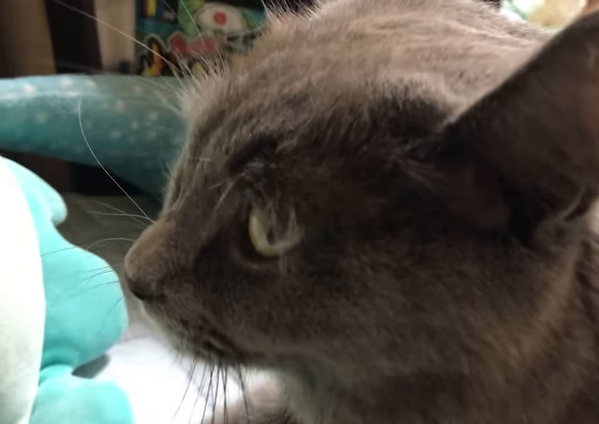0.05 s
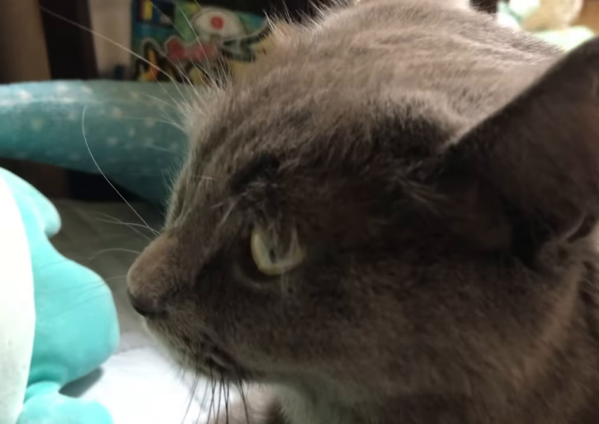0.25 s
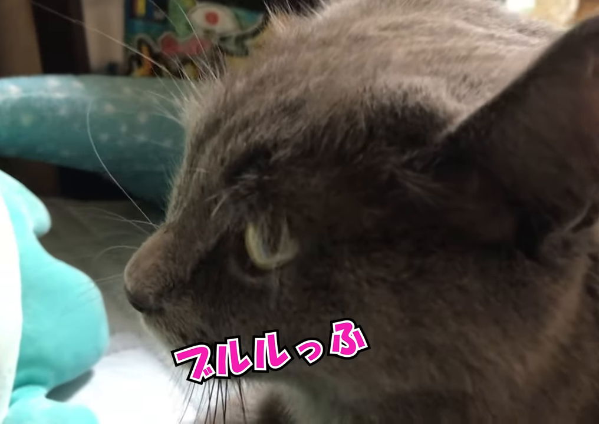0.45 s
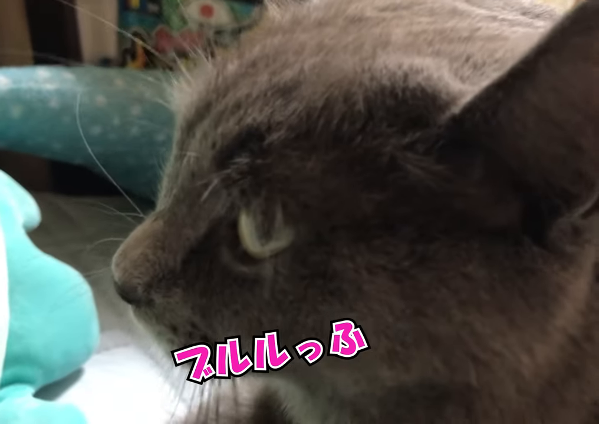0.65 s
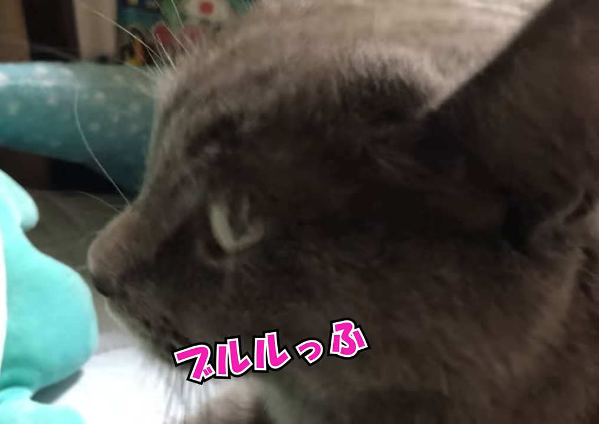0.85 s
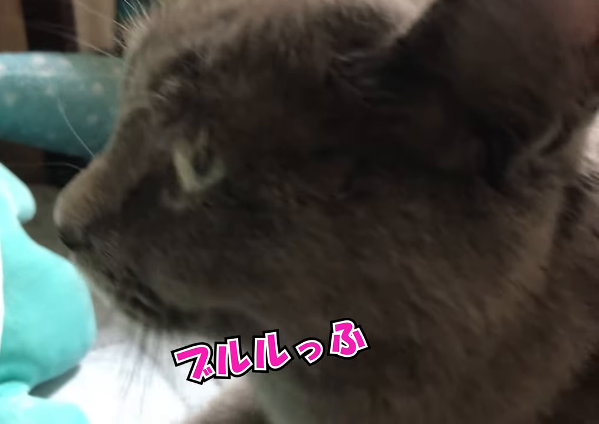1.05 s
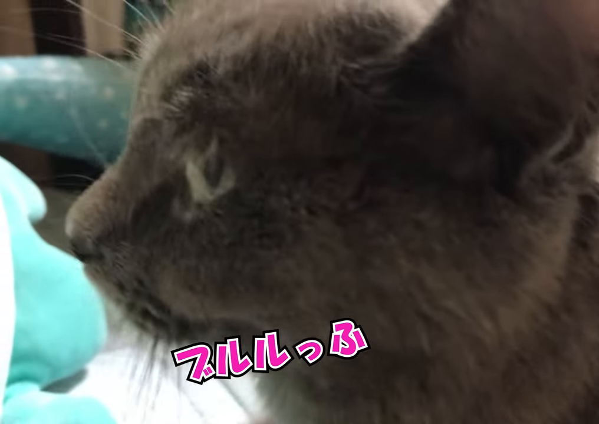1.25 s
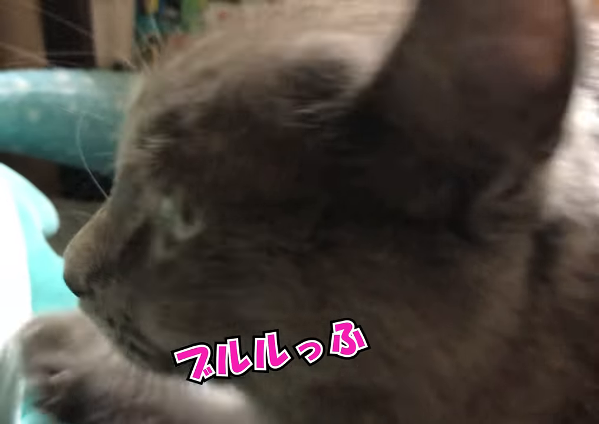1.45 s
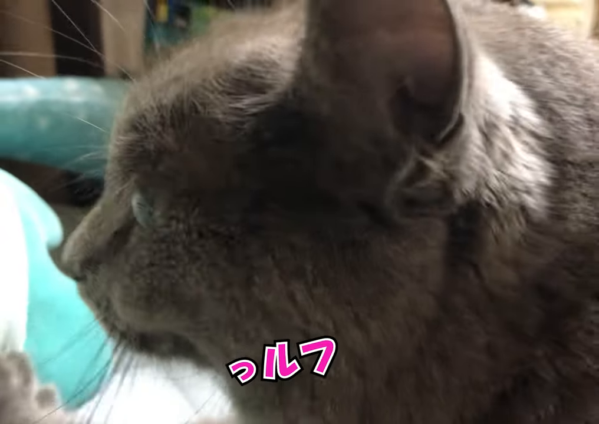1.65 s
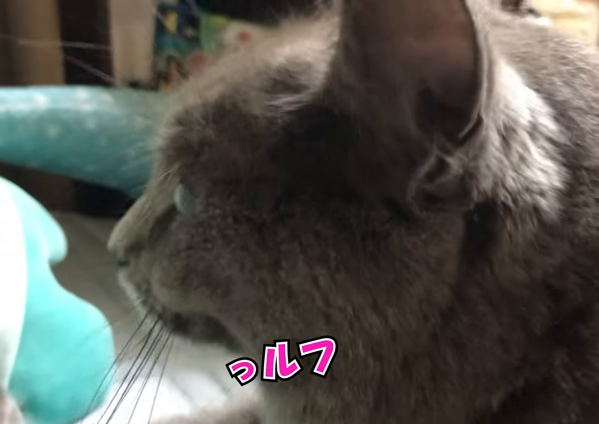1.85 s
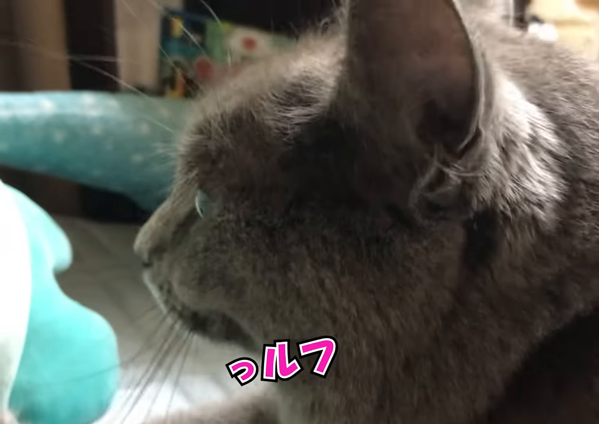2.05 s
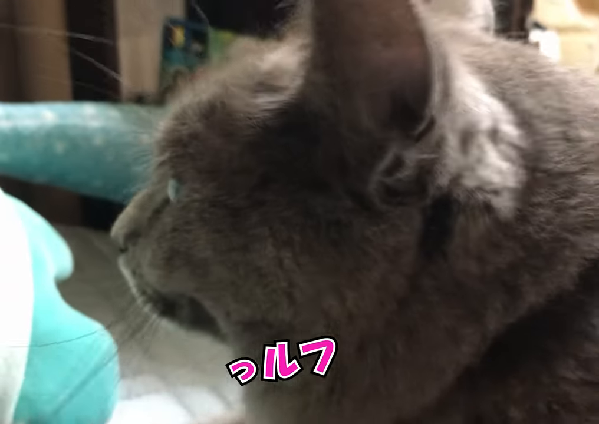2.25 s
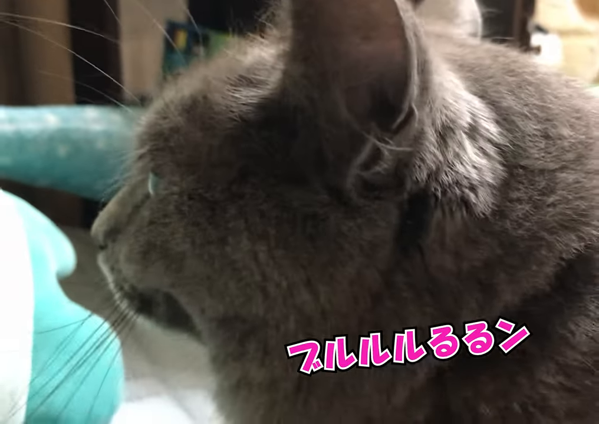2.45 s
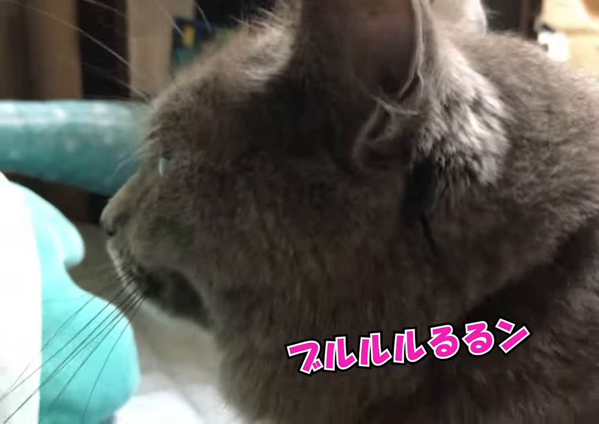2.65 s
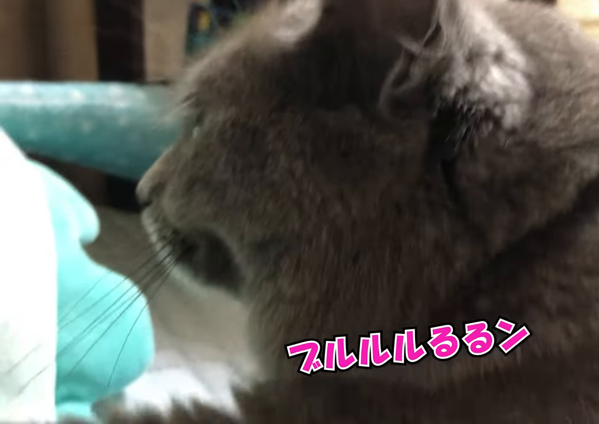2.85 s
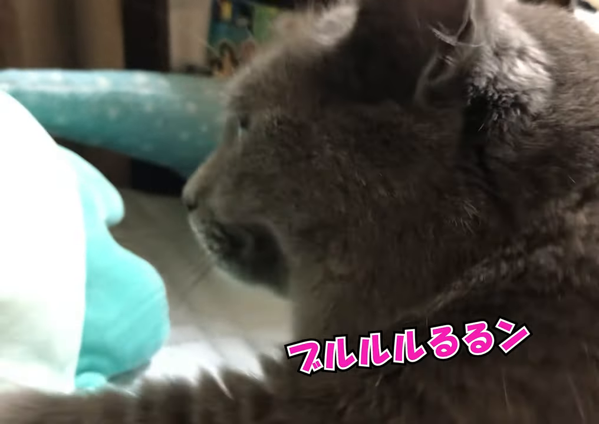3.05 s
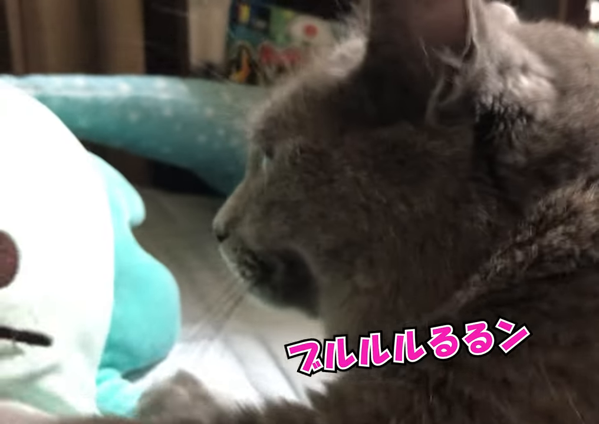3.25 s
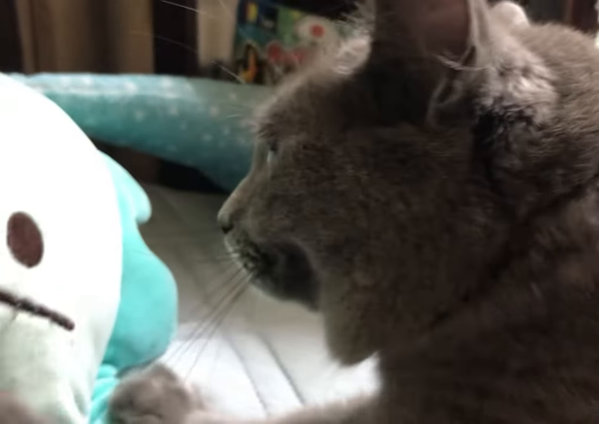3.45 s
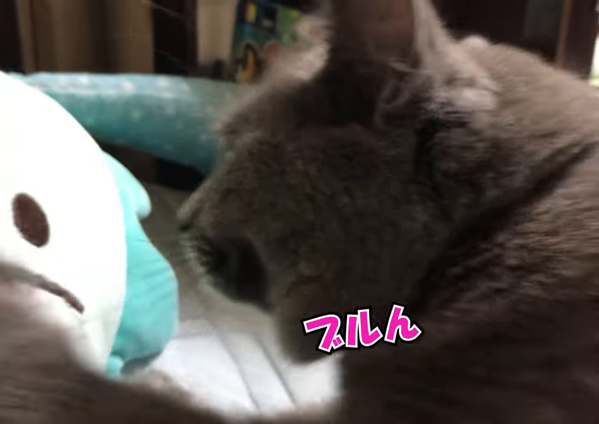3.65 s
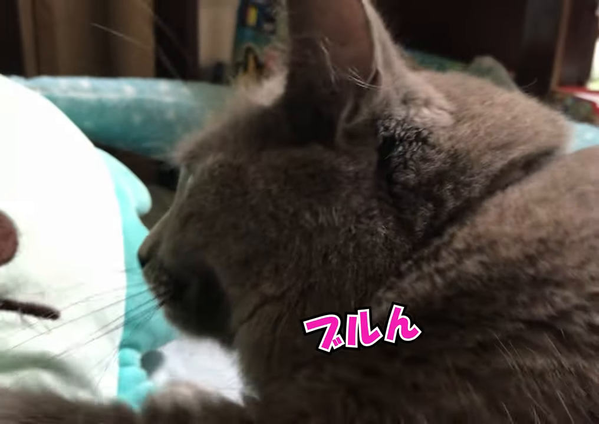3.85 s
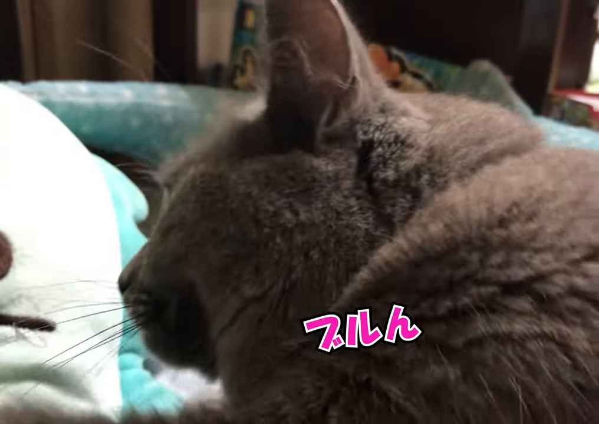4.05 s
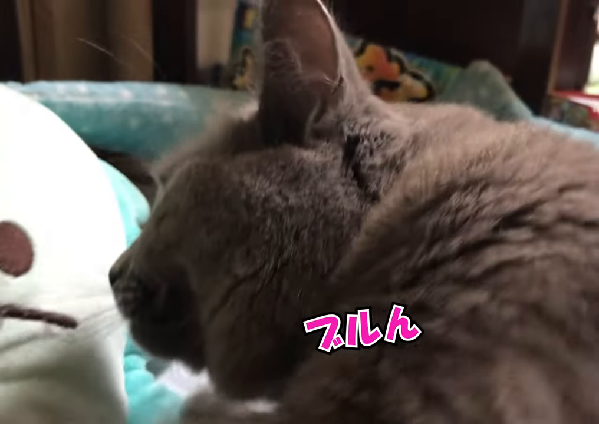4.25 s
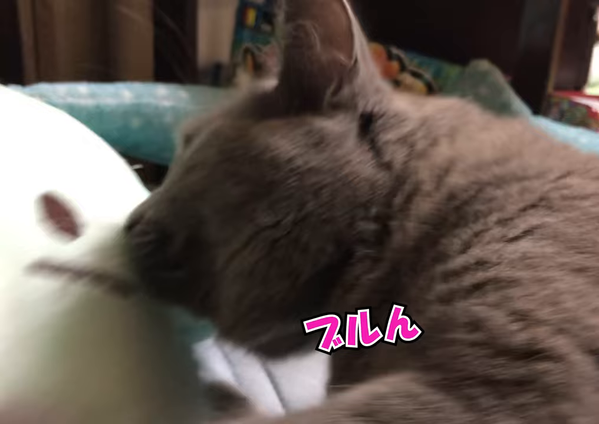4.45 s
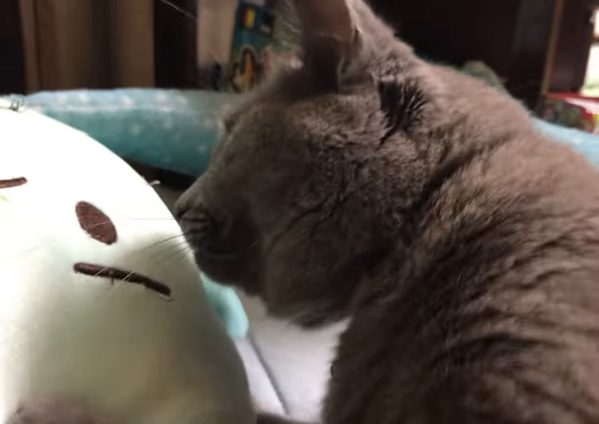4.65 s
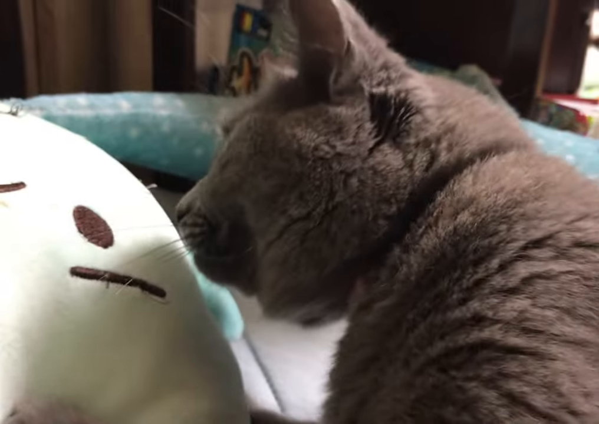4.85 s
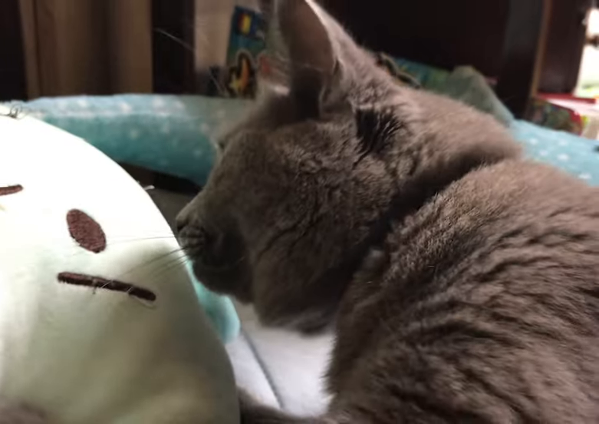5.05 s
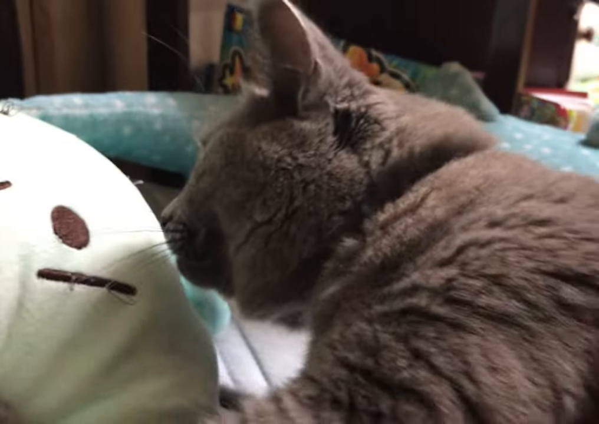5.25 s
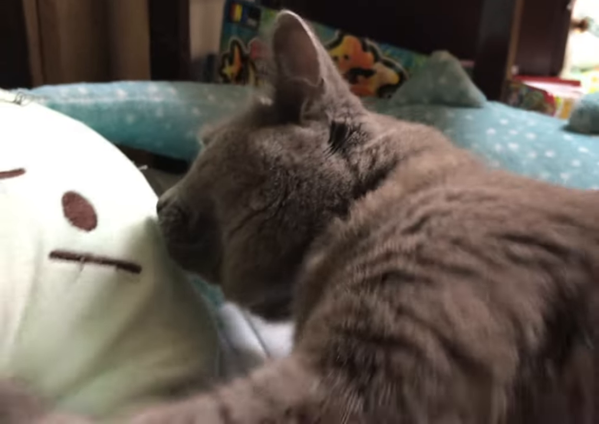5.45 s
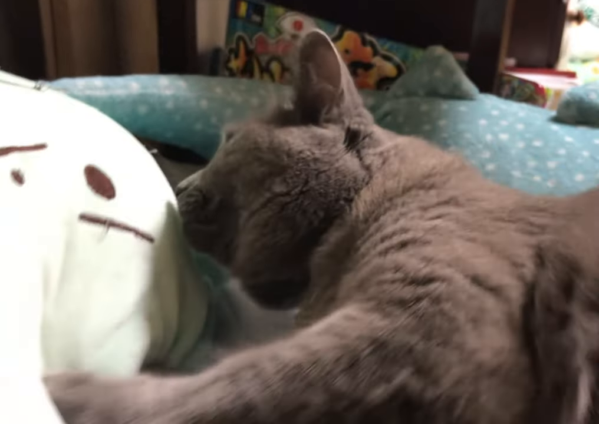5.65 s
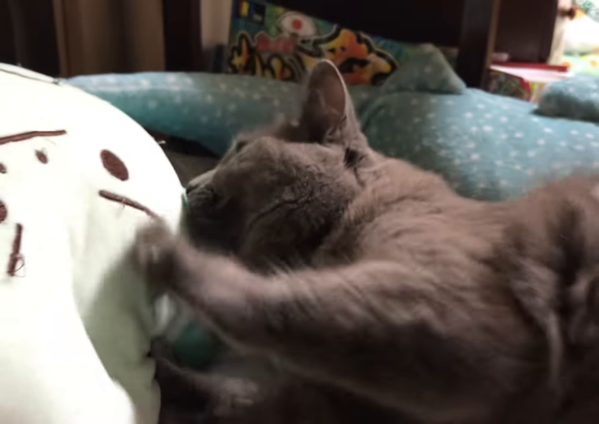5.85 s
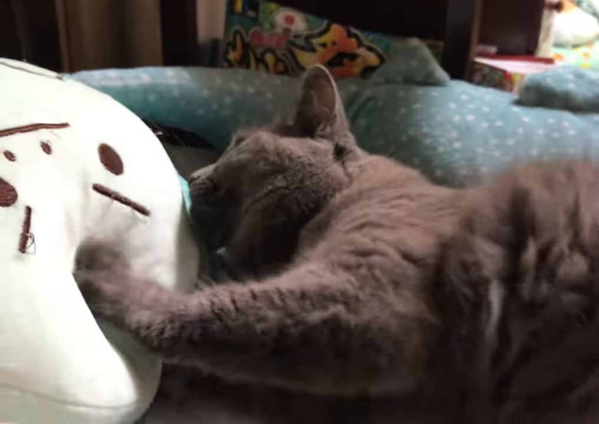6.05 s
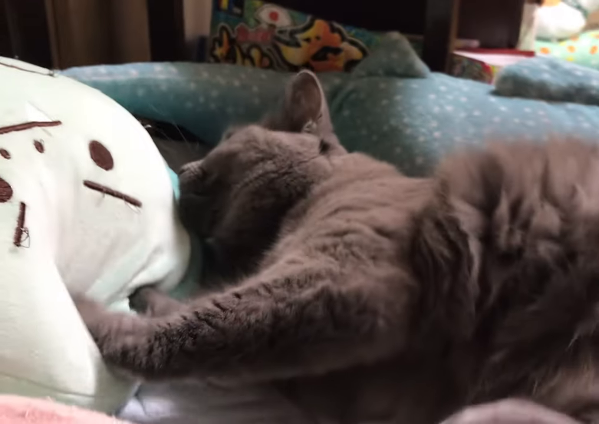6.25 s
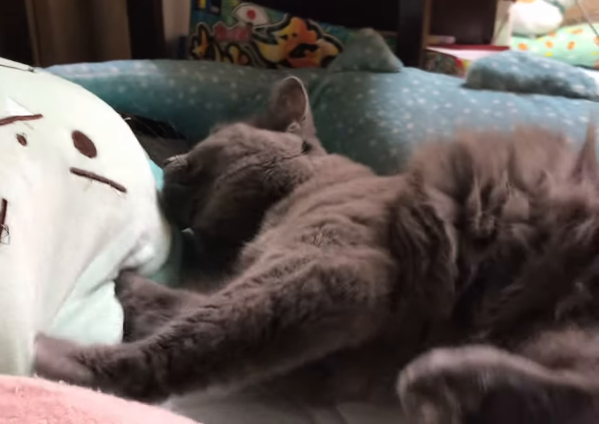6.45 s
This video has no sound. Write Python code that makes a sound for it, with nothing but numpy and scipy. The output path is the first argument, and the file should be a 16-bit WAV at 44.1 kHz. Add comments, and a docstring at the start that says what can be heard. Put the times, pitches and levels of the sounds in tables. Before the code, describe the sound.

Very close to the microphone in a quiet room, a cat purrs in five short bouts. A dull paw push and cloth slap come first, then a loud, rattling purr with hard knocks, a wet smack and tiny squeaks. Two more strong purrs follow with soft grunts, then two weaker, breathier ones. Small clicks, puffs and a hollow cluck fill the gaps before it fades to near silence.

```python
"""Cat purring and kneading

A cat purrs in five short bouts, its head close to the microphone, while kneading a cushion in a quiet room.
The larynx snaps shut about 29 times a second and rings throat, mouth and nose; air rushes between the snaps.
Effort, mouth opening and the nasal ring steer each bout; a faint rasp follows, and a few closures knock hard.
Within and between the bouts come soft grunts, a cluck, lip smacks, tongue ticks, tiny wet squeaks,
soft narrow bands of noise and dull pushes of the paws."""
import sys
import numpy as np
from scipy import signal
from scipy.fft import rfft, irfft, next_fast_len
from scipy.io import wavfile
from scipy.ndimage import map_coordinates

SR = 44100
rng = np.random.default_rng(int(sys.argv[2]) if len(sys.argv) > 2 else 0)


def store_pcm(level_fs):
    """Save levels as 16-bit WAV."""
    pcm = np.round(np.clip(level_fs, -1, 1) * 32767).astype(np.int16)
    wavfile.write(sys.argv[1], SR, np.atleast_2d(pcm).T)


N = 287223
T = np.arange(N) / SR

# mouth colour before tilt and drift: (frequency [Hz], relative level [dB])
MOUTH = [(620, -23), (860, -17.5), (960, 9), (1120, 8), (1490, 4), (1590, -24.5), (2500, -61)]
# nasal ring colour: (frequency [Hz], relative level [dB])
NASAL = [(1800, -49), (2300, -28.5), (2450, -1), (2900, -2.5), (3120, -28), (4200, -50)]
# low pop of throat and mouth: (frequency [Hz], relative level [dB])
POP = [(95, -52), (205, 5.5), (420, -1), (570, -2.5), (720, -55.5)]
# bright click of lips and tongue, before any tilt: (frequency [Hz], relative level [dB])
CLICK = [(650, -84.5), (960, 12.5), (1750, 4.5), (2000, -12.5), (2800, -21.5), (3300, -41), (16000, -61)]


def amp(db):
    """Amplitude of a level in dB."""
    return 10 ** (np.asarray(db) / 20)


def evened(x):
    """Scales to an RMS of 1."""
    return x / np.sqrt(np.mean(x ** 2) + 1e-20)


def add(mix, s, sound):
    """Lays a sound into the mix at time s."""
    part = mix[round(s * SR):][:len(sound)]
    part += sound[:len(part)]


def follow(rows, t):
    """The columns of a curve at the times t, joined by straight lines."""
    s, *columns = np.transpose(rows)
    return [np.interp(t, s, c) for c in columns]


def colour(x, points):
    """Filters by a spectrum of (Hz, dB) points, cut to -120 dB outside them."""
    size = next_fast_len(len(x))
    hz = np.fft.rfftfreq(size, 1 / SR)
    point_hz, point_db = np.transpose(points)
    gain_db = np.interp(np.log(hz + 1), np.log(point_hz), point_db, left=-120, right=-120)
    return irfft(rfft(x, size) * amp(gain_db), size)[:len(x)]


def tilted(points, db_per_octave):
    """A spectrum made brighter or duller, pivoting on its first point."""
    return [(hz, db + db_per_octave * np.log2(hz / points[0][0])) for hz, db in points]


def analysed(x, size):
    """Short-time spectrum: frequencies [Hz], frame times [s], complex bins."""
    return signal.stft(x, SR, nperseg=size, noverlap=size - size // 4)


def resynthesised(z, size, length):
    """Sound of a short-time spectrum."""
    return signal.istft(z, SR, nperseg=size, noverlap=size - size // 4)[1][:length]


def steadied(x, rate_hz):
    """Holds the power over three purr cycles at 1 and softens both ends."""
    window = np.hanning(int(3 * SR / rate_hz))
    power = abs(signal.fftconvolve(x ** 2, window / window.sum(), "same"))
    return x / np.sqrt(power + 1e-14) * signal.windows.tukey(len(x), .04)


def wavering(x, depth_db=4.5, breadth_hz=212.4, duration_s=0.03954):
    """Drifting patches of random gain, so that the colour shifts from moment to moment."""
    size = 512
    z = analysed(x, size)[2]
    rows, columns = np.indices(z.shape)
    patches = rng.standard_normal((256, 256))
    place = [rows * SR / size / breadth_hz, columns * (size // 4) / SR / duration_s]
    gain_db = depth_db * map_coordinates(patches, place, order=1, mode="mirror")
    return resynthesised(z * amp(gain_db), size, len(x))


def resonant(x, t, curve, peak_db, width_hz):
    """Lifts a resonance that follows a curve of (s, Hz) points."""
    size = 1024
    hz, when, z = analysed(x, size)
    off_hz = hz[:, None] - follow(curve, t[0] + when)[0]
    return resynthesised(z * amp(peak_db * np.exp(-(off_hz / width_hz) ** 2)), size, len(x))


def snap(points):
    """One sharp impulse of a given colour, scaled by its highest crest, a sixteenth of a second in."""
    sound = colour(1. * (np.arange(SR // 8) == SR // 16), points)
    return sound / sound.max()


def burst(points, db, tail_db, tail_t60, rise_t60, bend=1.43):
    """A sharp snap a sixteenth of a second in, wrapped in a short fizz of its colour that dies ever faster."""
    t = np.arange(-SR // 16, SR // 4) / SR
    crack = colour(1. * (t == 0), points)
    fall = (np.maximum(t, 0) / tail_t60) ** bend
    envelope = amp(-60 * np.maximum(fall, -t / rise_t60))
    fizz = evened(colour(rng.standard_normal(len(t)), points)) * envelope
    return t[0], amp(db) * (crack / crack.max() + amp(tail_db) * fizz)


def larynx(t, first, rate_hz, air_db, leak, lead, spread, uneven_db=2, jitter_s=.0006):
    """A snap at each closure, and turbulence that swells just before it; lead and spread in cycles."""
    count = int((t[-1] - first) * rate_hz) + 1
    slip, size = rng.standard_normal((count, 2)).T
    at = np.round((first + np.arange(count) / rate_hz + jitter_s * slip - t[0]) * SR).astype(int)
    snaps = np.zeros(len(t))
    snaps[np.clip(at, 0, len(t) - 1)] = amp(uneven_db * size) * (at > 0)
    phase = ((t - first) * rate_hz + lead + .5) % 1 - .5
    gate = leak + np.exp(-(phase / spread) ** 2)
    air = evened(gate * rng.standard_normal(len(t)))
    return evened(snaps) + amp(air_db) * air


def throat(x, t, centre_hz, level_db, width_hz, upper_db):
    """A moving resonance with a sharp core and a fixed one above; both dull as effort and resonance sink."""
    upper_hz, upper_width_hz, chest_hz = 510, 80, 198
    core_db, core_width_hz = -9, 38
    broaden, brighten, rise_db_per_octave = 0.099, 0.45, 36  # first two in dB per dB of openness
    size = 2048
    hz, when, z = analysed(x, size)
    hz = hz[:, None]
    octaves = np.log2(centre_hz / np.median(centre_hz))
    openness_db = level_db - np.median(level_db) + rise_db_per_octave * octaves
    open_db = np.interp(t[0] + when, t, openness_db)
    off_hz = hz - np.interp(t[0] + when, t, centre_hz)
    main = np.exp(-(off_hz / (width_hz * amp(broaden * open_db))) ** 2)
    core = amp(core_db) * np.exp(-(off_hz / core_width_hz) ** 2)
    upper = amp(upper_db + brighten * open_db) * np.exp(-((hz - upper_hz) / upper_width_hz) ** 2)
    low_cut = 1 / np.sqrt(1 + (chest_hz / (hz + 1)) ** 20)
    return resynthesised(z * (main + core + upper) * low_cut, size, len(x))


def purr():
    """Each bout's snaps and rushing air drive throat, mouth, lips and nose; a faint rasp rides on top."""
    # one row a bout: (first snap [s], snap rate [Hz])
    beats = [(.4435, 28.9), (1.519, 28.6), (2.504, 29.04), (3.721, 28.2), (5.293, 28.5)]
    # airway, one row a bout: (throat width at median openness [Hz], upper throat mode there [dB],
    # throat air re snaps [dB], mouth air re snaps [dB], mouth tilt [dB/octave],
    # rasp resonance [Hz], rasp offset before effort and mouth terms [dB])
    bouts = [(127.3, -21.5, -2, -0.5, 0, 6400, -59.5), (108.2, -11.5, -2.5, -0.5, -19.5, 4500, -59),
             (105, -14, -1, 4, 0, 5600, -61.5), (77.4, -32.5, 8.5, 4, -13, 5000, -59.5),
             (60, -31.5, 7, 1.5, -2.5, 4640, -59)]
    # effort, one curve a bout: (time [s], throat level [dB], throat resonance [Hz])
    efforts = [
        [(0.425, -59.5, 323), (0.51, -31.5, 270), (0.679, -29, 313), (0.867, -31.5, 241), (0.899, -39, 235.5),
         (1.005, -27.5, 325.5), (1.15, -75.5, 251)],
        [(1.51, -49, 220), (1.575, -64, 430), (1.618, -30.5, 440), (1.692, -28, 367), (1.73, -41.5, 312),
         (1.765, -32.5, 379), (1.831, -38, 440.4), (1.92, -41.5, 396.3), (2.06, -66, 350)],
        [(2.485, -52.5, 370), (2.533, -20, 312.6), (2.617, -37, 323), (2.701, -31, 301), (3.031, -34, 300),
         (3.075, -51.5, 270), (3.089, -40, 270.6), (3.17, -60, 245)],
        [(3.7, -71.5, 378), (3.752, -39, 386), (3.834, -53.5, 354.4), (3.892, -36, 343), (3.975, -48, 347),
         (4.035, -36.5, 387), (4.115, -48.5, 321), (4.18, -35.5, 375), (4.294, -46, 373), (4.38, -84, 323)],
        [(5.28, -68, 389), (5.334, -41, 347), (5.406, -40, 374), (5.45, -58, 397), (5.57, -74, 327),
         (5.616, -41, 403), (5.67, -51.5, 387), (5.874, -52, 420), (6.09, -74.5, 379)],
    ]
    # mouth opening, one curve a bout: (time [s], mouth level [dB])
    openings = [
        [(0.47, -88), (0.505, -46), (0.56, -34), (0.862, -44), (0.95, -63.5), (0.992, -40), (1.14, -76.5)],
        [(1.505, -65), (1.604, -52.5), (1.622, -40), (1.648, -36), (1.758, -63), (2.06, -77)],
        [(2.49, -91.5), (2.536, -37.5), (2.608, -52), (2.702, -43), (2.852, -63.5), (2.885, -45), (2.992, -42),
         (3.1, -85)],
        [(3.82, -77.5), (3.96, -61.5), (4.006, -41), (4.094, -50), (4.174, -43.5), (4.224, -59.5), (4.324, -60),
         (4.38, -87)],
        [(5.36, -89), (5.406, -55.5), (5.462, -73), (5.595, -61), (5.645, -44), (5.715, -55), (5.79, -44),
         (5.895, -56), (5.945, -46), (6.01, -49), (6.09, -74)],
    ]
    # mouth resonance drifting with jaw and tongue, one curve a bout: (time [s], resonance [Hz])
    mouth_curves = [
        [(0.51, 1355), (0.548, 1064), (0.65, 1374), (0.75, 1173)],
        [(1.625, 1044), (1.66, 1500), (1.82, 1060)],
        [(2.82, 1102), (2.88, 1305), (2.986, 1050)],
        [(4.05, 1050), (4.09, 1500), (4.16, 1060)],
        [(5.672, 1230), (5.856, 1166)],
    ]
    # nasal ring: (time [s], level [dB])
    nose_curve = [(0.48, -96.5), (0.51, -59), (0.64, -45), (0.885, -50.5), (1.06, -74), (1.095, -58),
                  (1.17, -78.5), (2.5, -88.5), (2.54, -65.5), (2.7, -64.5), (2.81, -73.5), (2.95, -60),
                  (3.1, -89.5)]
    # lips part and let out an overtone: (widest moment [s], level before limits [dB], swell [dB/s])
    partings = [(0.653, -47.5, 108.5), (1.655, -42, 554.5), (2.629, -54.5, 87.5), (4.092, -41, 376)]
    # overtone colour: (frequency [Hz], relative level [dB])
    lip_points = [(1250, -46), (1480, -1), (1820, -5.5), (1990, -43)]
    # rasp colour: (frequency [Hz], relative level [dB])
    hiss_points = [(2000, 0), (2800, 0), (4000, -9.5), (5600, -0.5), (12000, -8.5)]
    close_db_per_s = 160.5
    lips_shut_db, lips_wide_db = -35, 2.5  # limits relative to the mouth
    rasp_per_effort, rasp_per_mouth = .3, 0.1552  # dB per dB

    out = np.zeros(N)
    for (first, rate_hz), bout, effort, opening, mouth_hz in zip(
            beats, bouts, efforts, openings, mouth_curves):
        width_hz, upper_db, throat_air_db, mouth_air_db, tilt_db, rasp_hz, hiss_db = bout
        t = np.arange(min(effort[0][0], opening[0][0]), effort[-1][0], 1 / SR)
        effort_db, centre_hz = follow(effort, t)
        mouth_db, = follow(opening, t)
        nose_db, = follow(nose_curve, t)
        lips_db = np.max([db - np.maximum(swell * (widest - t), close_db_per_s * (t - widest))
                          for widest, db, swell in partings], axis=0)
        lips_db = np.clip(lips_db, mouth_db + lips_shut_db, mouth_db + lips_wide_db)
        rasp_db = hiss_db + rasp_per_effort * effort_db + rasp_per_mouth * mouth_db

        deep = larynx(t, first, rate_hz, throat_air_db, leak=.52, lead=0.11, spread=0.19, uneven_db=4.0)
        airy = larynx(t, first, rate_hz, mouth_air_db, leak=0.37, lead=.096, spread=0.14, uneven_db=5.5)
        nasal = larynx(t, first, rate_hz, air_db=7.0, leak=0.43, lead=0.14, spread=0.14)
        rasp = larynx(t, first, rate_hz, air_db=13.0, leak=0.055, lead=0.024, spread=0.21)
        oral = resonant(airy, t, mouth_hz, peak_db=8, width_hz=200)
        rasp = resonant(rasp, t, [(first, rasp_hz)], peak_db=6.5, width_hz=490)

        voiced = throat(deep, t, centre_hz, effort_db, width_hz, upper_db)
        add(out, t[0], amp(effort_db) * steadied(voiced, rate_hz))
        for db, points, drive in ((mouth_db, tilted(MOUTH, tilt_db), oral), (lips_db, lip_points, airy),
                                  (nose_db, NASAL, nasal), (rasp_db, hiss_points, rasp)):
            add(out, t[0], amp(db) * steadied(wavering(colour(drive, points)), rate_hz))
    return out


def with_hard_snaps(purring):
    """The larynx slams shut: a crisp knock sounds while the ordinary purr briefly gives way."""
    # hardest closures: (time [s], throat level [dB], mouth level [dB], nose level [dB])
    closures = [(0.5473, -22, -22.5, -61.5), (0.6148, -13, -20.5, -27), (0.6492, -15, -19.5, -30),
                (0.6866, -20, -19.5, -35.5), (1.6225, -38, -28, -67.5), (2.5362, -15, -34, -55),
                (2.711, -19.5, -31.5, -53)]
    throat_lag_s, half_s, yield_share = 0.0004, 0.0052, 0.63
    out, ordinary = np.zeros(N), np.ones(N)
    for s, throat_db, mouth_db, nose_db in closures:
        ordinary *= 1 - yield_share * np.exp(-((T - s) / half_s) ** 2)
        throat_knock = -signal.hilbert(snap(POP)).imag  # phase turned a quarter cycle
        add(out, s + throat_lag_s - 1 / 16, amp(throat_db) * throat_knock)
        add(out, s - 1 / 16, amp(mouth_db) * snap(MOUTH) + amp(nose_db) * snap(NASAL))
    return out + ordinary * purring


def idling(lead_s=0.088, fade_s=0.18, fade_db_per_s=147):
    """A very faint, dull purr of uneven snaps and air flutters on between the bouts."""
    # stretches: (first snap [s], end [s], snap rate [Hz], level before end fade [dB])
    stretches = [(0.023, 0.164, 27, -69), (2.014, 2.275, 33.5, -71.5), (4.4397, 5.156, 29, -76)]
    # colour: (frequency [Hz], relative level [dB])
    idle_points = [(40, -7), (250, 0.5), (750, -15.5), (1600, -13), (2200, -22.5), (12000, -34)]
    out = np.zeros(N)
    for first, end, rate_hz, db in stretches:
        t = np.arange(max(first - lead_s, 0), end + fade_s, 1 / SR)
        drive = larynx(t, first, rate_hz, air_db=-2, leak=.15, lead=.05, spread=.15,
                       uneven_db=2.5, jitter_s=.0012)
        level_db = db - fade_db_per_s * np.maximum(t - end, 0)
        add(out, t[0], amp(level_db) * evened(wavering(colour(drive, idle_points))))
    return out


def puffs():
    """Soft narrow noise bands that swell and fade, from low and hollow to high and hissing."""
    # (time [s], centre [Hz], level at the height of the swell [dB], half length [s])
    bands = [(0.609, 6920, -57, 0.069), (0.71, 5950, -58, 0.023), (1.941, 1700, -62, 0.037),
             (2.597, 5540, -70, 0.04), (2.97, 2175, -65.5, 0.035), (3.596, 1685, -65.5, 0.025),
             (4.192, 5400, -68, 0.02), (4.303, 866, -62.5, 0.064), (5.528, 1069, -51, 0.035)]
    out = np.zeros(N)
    for s, hz, db, half_s in bands:
        points = [(hz * .7, -35), (hz * .88, -1), (hz * 1.11, 0), (hz * 1.17, -18), (hz * 2, -30)]
        band = evened(wavering(colour(rng.standard_normal(SR), points)))
        add(out, s - 1 / 2, amp(db) * band * np.exp(-((T[:SR] - 1 / 2) / half_s) ** 2))
    return out


def grunts():
    """Soft throat grunts and a hollow mouth cluck: a short tone pulse trailed by a narrow noise rattle."""
    # (time [s], pitch [Hz], pulse envelope peak [dB], half length [s], rattle level re pulse [dB])
    pulses = [(1.507, 216, -23.5, 0.0069, -19), (1.651, 437, -18.5, 0.0064, -35),
              (1.6856, 268.5, -13.5, 0.0045, -27), (2.504, 438, -30.5, 0.0048, -16.5),
              (3.352, 447, -43.5, 0.0036, -14), (3.58, 313, -45, 0.0097, -14.5),
              (5.097, 236, -39, 0.012, -21), (5.5405, 1055, -28, 0.0039, -23.5)]
    spread_hz, lag_s, rattle_half_s = 125, .022, 0.027
    out, t = np.zeros(N), np.arange(-SR // 8, SR // 4) / SR
    lowpass = signal.butter(6, spread_hz, fs=SR, output="sos")
    for s, hz, db, half_s, rattle_db in pulses:
        turn = np.exp(2j * np.pi * hz * t)
        jumble = signal.sosfilt(lowpass, rng.standard_normal((2, len(t))))
        rattle = evened(jumble[0] * turn.real + jumble[1] * turn.imag)  # noise moved up to the pitch
        rattle *= np.exp(-((t - lag_s) / rattle_half_s) ** 2)
        pulse = np.exp(-(t / half_s) ** 2) * turn.imag
        add(out, s + t[0], amp(db) * (pulse + amp(rattle_db) * rattle))
    return out


def smacks(pop_delay_s=0.001):
    """Knocks of a click and a pop that fizz briefly: mostly the lips peeling apart and letting go, the first
    one a paw landing on the cushion."""
    # (time [s], low pop level [dB], bright click level [dB], wet tail re pop and click [dB]); the first row
    # sounds with the paw's slap
    partings = [(0.18, -29, -41.5, -13), (1.256, -20, -20, -22), (3.254, -53, -54.5, -9),
                (5.245, -56, -42, -16.5), (5.279, -54, -38.5, -18.5)]
    out = np.zeros(N)
    for s, pop_db, click_db, tail_db in partings:
        for points, db, delay_s in (POP, pop_db, pop_delay_s), (CLICK, click_db, 0):
            lead_s, sound = burst(points, db, tail_db, tail_t60=0.15, rise_t60=0.043)
            add(out, s + lead_s + delay_s, sound)
    return out


def ticks():
    """The tongue comes unstuck with a dry tick, a brightened click."""
    # (time [s], level [dB])
    releases = [(3.2516, -45), (3.3508, -57)]
    out = np.zeros(N)
    for s, db in releases:
        add(out, s - 1 / 16, amp(db) * snap(tilted(CLICK, db_per_octave=8)))
    return out


def squeaks(count=4, tail_t60=0.1498, bend=1.2):
    """Wet squeaks: a string of ever weaker bubbles sliding up in pitch, with a faint high noise echo."""
    # (time [s], first bubble level before filter [dB], pitch the slide nears [Hz], echo re string [dB])
    strings = [(0.293, -37.5, 9100, -7.5), (0.983, -19, 9180, -11), (1.0026, -8, 9270, -23),
               (1.019, -15, 9080, -18), (1.033, -24.5, 9050, -14.5), (1.588, -22.5, 9210, -12),
               (3.603, -49.5, 9000, 0)]
    # echo colour: (frequency [Hz], relative level [dB])
    echo_points = [(7200, -51), (7700, -6.5), (9650, 4), (9900, -39.5)]
    bubble_s, glide_share, glide_s = 0.00363, 0.019, 0.00061
    gap_s, gap_scatter, step_db, pitch_scatter = .0028, 0.248, -8, 0.01984  # later bubbles; scatters as shares
    lead_s = .05
    out, t, span = np.zeros(N), np.arange(0, bubble_s, 1 / SR), T[:SR // 2]
    power_fade = amp(-60 * (span / tail_t60) ** bend) ** 2
    glide = 1 - glide_share * np.exp(-t / glide_s)
    for s, db, hz, echo_db in strings:
        string = np.zeros(len(span))
        for k, (slip, detune) in enumerate(2 * rng.random((count, 2)) - 1):
            bubble_hz = hz * (1 + pitch_scatter * detune * min(k, 1))  # the first keeps its pitch
            turns = np.cumsum(bubble_hz * glide) / SR
            bubble = np.sin(np.pi * t / bubble_s) * np.sin(2 * np.pi * turns)
            add(string, lead_s + gap_s * k * (1 + gap_scatter * slip), amp(db + step_db * k) * bubble)
        string = colour(string, [(6500, -35), (7800, 0), (9700, 0), (10300, -14), (14000, -25)])
        power = signal.fftconvolve(string ** 2, power_fade / power_fade.sum())[:len(span)]
        echo = np.sqrt(abs(power)) * evened(colour(rng.standard_normal(len(span)), echo_points))
        add(out, s - lead_s, string + amp(echo_db) * echo)
    return out


def swells(rows, rumble_db, rumble_t60):
    """Soft, damped tones, each trailing off in a low noise rumble around its pitch."""
    out, t = np.zeros(N), np.arange(-SR // 8, SR // 4) / SR
    for s, hz, db, half_s in rows:
        tone = np.exp(-(t / half_s) ** 2) * np.sin(2 * np.pi * hz * t)
        points = [(hz * .55, -22), (hz, 0), (hz * 1.8, -9), (hz * 3.5, -40)]
        rumble = evened(colour(rng.standard_normal(len(t)), points))
        fade = amp(rumble_db - 60 * abs(t) / rumble_t60) * np.clip(t / half_s + 1, 0, 1)
        add(out, s + t[0], amp(db) * (tone + fade * rumble))
    return out


def paws():
    """Dull pushes into the stuffing, which sways after them, and a slap on the cloth."""
    # pushes: (time [s], pitch [Hz], tone envelope peak [dB], half length [s])
    pushes = [(0.194, 95, -14, 0.0094), (1.091, 39.5, -41.5, 0.033), (1.869, 105, -32.5, 0.037),
              (4.258, 119, -25.5, .011), (6.422, 110, -51, 0.055), (6.505, 36, -41, 0.02)]
    # slaps: (time [s], level [dB], rustle re slap [dB])
    slaps = [(0.181, -16, -17.5)]
    # slapped cloth colour: (frequency [Hz], relative level [dB])
    cloth_points = [(150, -46), (330, 9), (880, -0.5), (1100, -14), (1380, -48), (1560, 0.5), (2420, -30.5)]
    sway_hz, sway_db, sway_lag_s, sway_half_s = 45.3, -18, .012, 0.015
    db_per_doubling = 10.5  # slower pushes set the stuffing swaying more
    sways = []
    for s, _, db, half_s in pushes:
        level_db = db + sway_db + db_per_doubling * np.log2(half_s / sway_half_s)
        sways.append((s + sway_lag_s, sway_hz, level_db, sway_half_s))
    out = swells(pushes + sways, rumble_db=-22.0, rumble_t60=0.22)
    for s, db, rustle_db in slaps:
        lead_s, sound = burst(cloth_points, db, rustle_db, tail_t60=0.12, rise_t60=0.014)
        add(out, s + lead_s, sound)
    return out


def room(level_db=-69):
    """The steady air of a quiet room, as coloured noise."""
    # (frequency [Hz], relative level [dB])
    air_points = [(20, -14.5), (53, 1), (150, -4.5), (220, -1.5), (457, -15), (2060, -24.5), (15500, -31)]
    return amp(level_db) * evened(colour(rng.standard_normal(N), air_points))


def scene():
    """The cat's sounds, the paws and the room, summed to one channel."""
    cat = with_hard_snaps(purr()) + idling() + puffs() + grunts() + smacks() + ticks() + squeaks()
    return (cat + paws() + room())[None]


def record(dry, edge_hz=15750):
    """The recorder's band limit, a linear-phase low-pass."""
    lowpass = signal.firwin(511, edge_hz, window=("kaiser", 9), fs=SR)
    return signal.oaconvolve(dry, lowpass[None], "same")


dry = scene()
out = record(dry)
store_pcm(out)
```